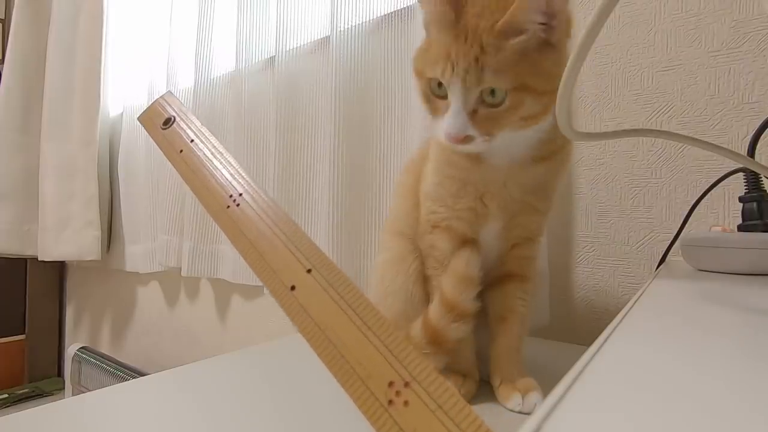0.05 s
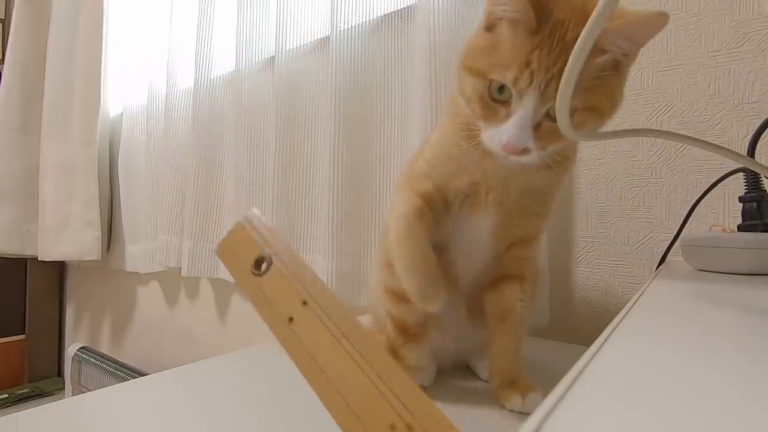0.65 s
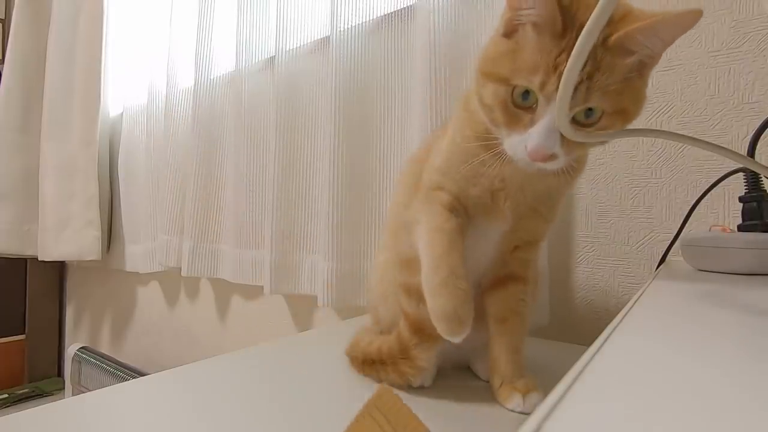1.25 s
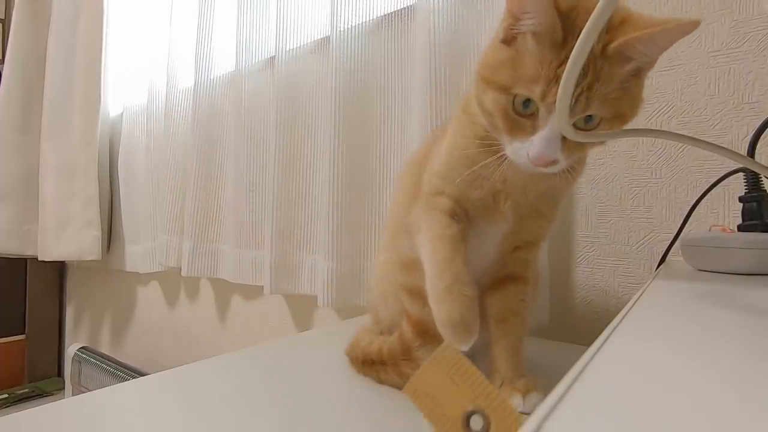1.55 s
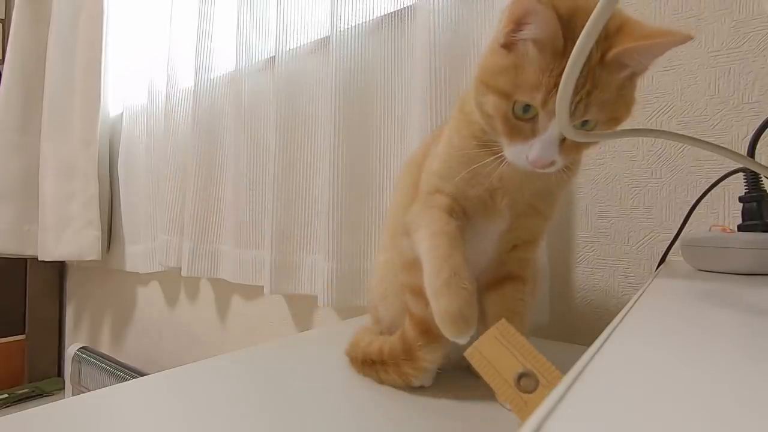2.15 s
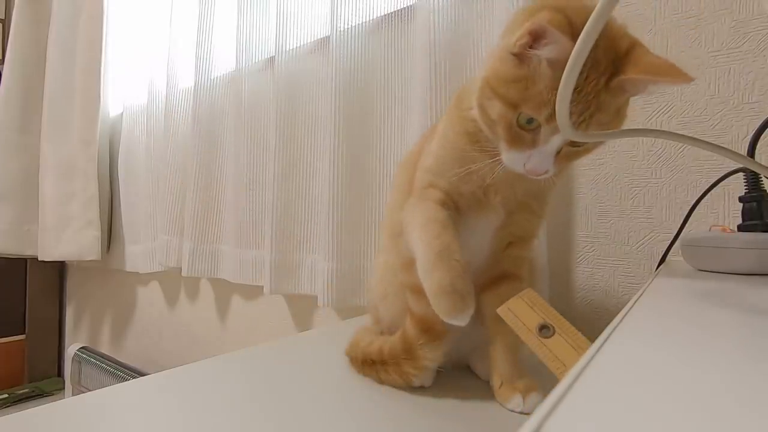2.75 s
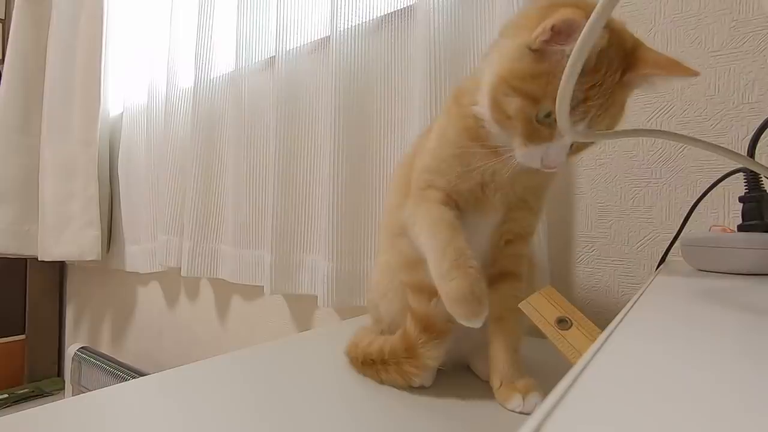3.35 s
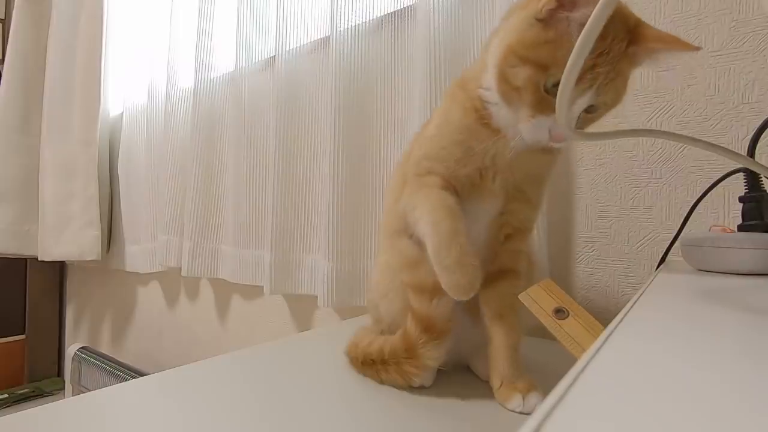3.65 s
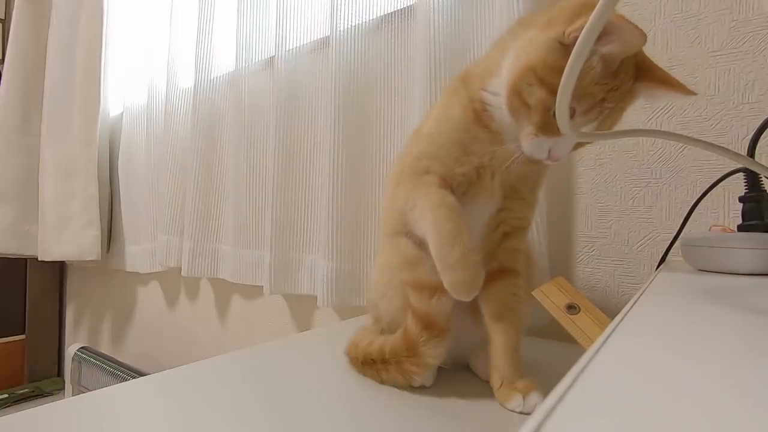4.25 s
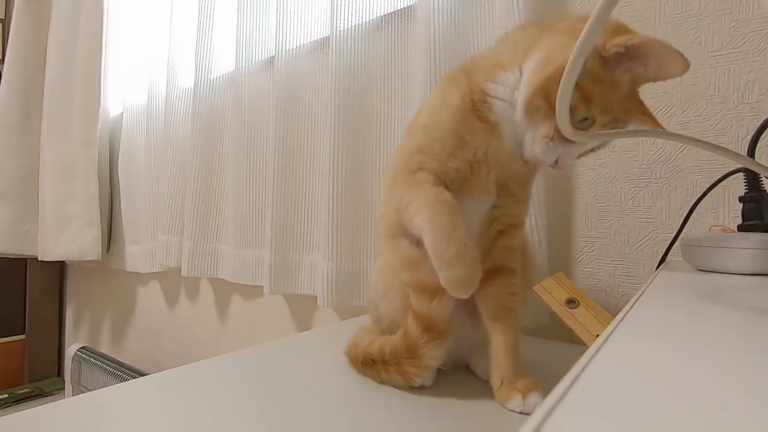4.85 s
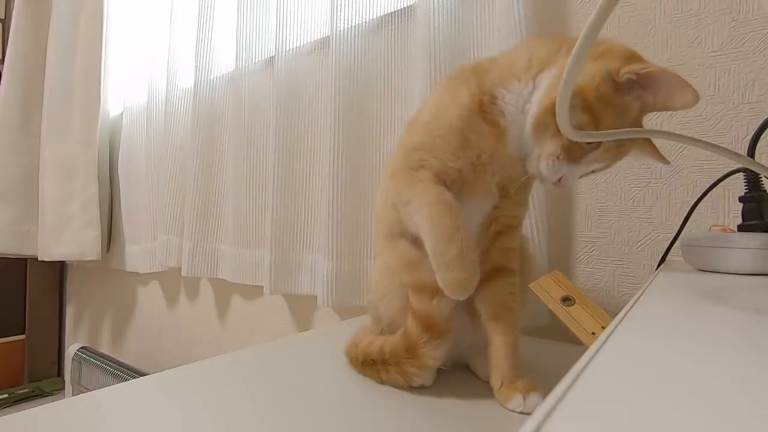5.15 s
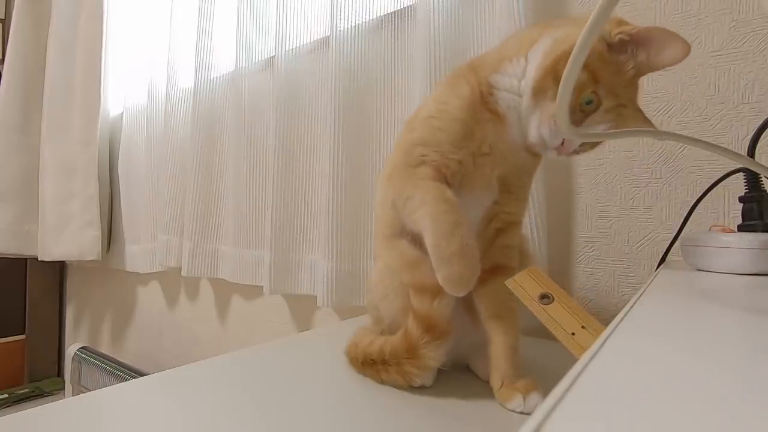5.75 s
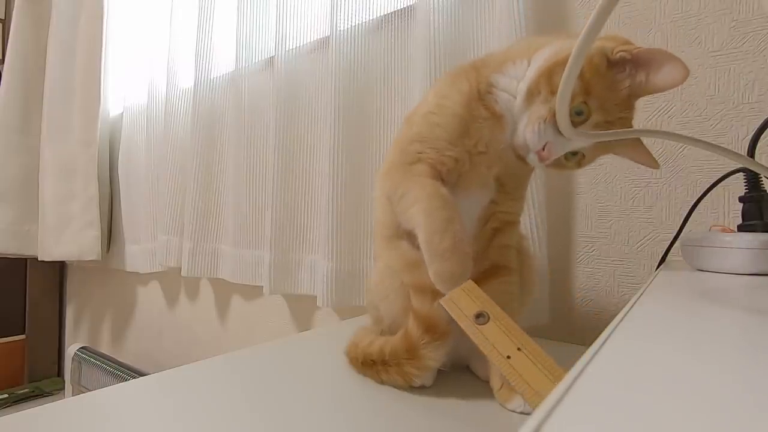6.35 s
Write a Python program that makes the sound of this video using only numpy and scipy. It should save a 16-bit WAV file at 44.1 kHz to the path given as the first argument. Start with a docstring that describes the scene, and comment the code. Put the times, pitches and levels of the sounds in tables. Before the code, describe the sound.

A wooden ruler scrapes, chatters and knocks lightly along a desk edge, over the soft hum of a small fan.

```python
"""A wooden ruler is slid and rocked along a desk's edge to tease a cat, in a quiet room with a small fan.
In the first second sliding friction makes the edge hiss, with dry skips and a few knocks. From 1.4 to
2.9 s stick-slip motion takes over: the edge chatters and catches hard, exciting the modes of ruler and
desktop, and the desk's hollow side panel rings in sympathy. The strokes then thin out, pause near 5 s
and end in a last flurry around 6 s. The fan hums on in the background."""
import sys
import numpy as np
from scipy import signal
from scipy.fft import rfft, irfft, next_fast_len
from scipy.io import wavfile
from scipy.ndimage import uniform_filter1d, map_coordinates

SR = 44100
rng = np.random.default_rng(int(sys.argv[2]) if len(sys.argv) > 2 else 0)


def inscribe(sig):
    """Save sig as 16-bit PCM at rate SR to the path in sys.argv[1].

    A 1-D sig is mono; a 2-D sig holds one channel per row.
    Samples are clipped to [-1, 1] before scaling.
    """
    pcm = np.round(np.clip(np.atleast_2d(sig).T, -1, 1) * 32767)
    wavfile.write(sys.argv[1], SR, pcm.astype(np.int16))


N = 290663
TIME = np.arange(N) / SR

# hard catches of the edge: (time [s], level [dB], desktop re level [dB], scuff re level [dB])
KNOCKS = [(0.281, -39, -1, -16), (0.315, -37, -6.5, -17), (0.446, -36.5, -10, -16), (0.5, -35, -8.5, -10),
          (0.554, -34.5, -21, -13), (0.985, -24.5, 1, -14.5), (1.376, -36, 1.5, -27.5),
          (1.402, -36.5, 10.5, -16.5), (1.431, -22.5, -11.5, -18), (1.454, -24.5, -15.5, -23),
          (1.465, -23, -3.5, -18), (1.4981, -24, -7, -14), (1.5135, -28.5, -16, -19),
          (1.5267, -26, 0.5, -29.5), (1.553, -39, -8.5, -23), (1.679, -23.5, -3.5, -15),
          (1.711, -24.5, -3.5, -14), (1.7323, -29, 2, -25), (1.75, -29.5, -3, -21.5),
          (1.946, -34.5, 1.5, -29), (2.037, -33.5, 7.5, -22.5), (2.094, -33.5, 3.5, -20.5),
          (2.1086, -29, -1.5, -28), (2.119, -26.5, 0.5, -24), (2.1337, -28, 6, -16.5),
          (2.151, -22, 0, -14.5), (2.163, -31, -7.5, -18), (2.176, -24, -2.5, -30),
          (2.1978, -28.5, -6.5, -22.5), (2.206, -25, 2.5, -16.5), (2.222, -35, -2.5, -22),
          (2.2319, -21, -8.5, -26), (2.248, -30, -7, -20), (2.266, -28, -11.5, -26.5),
          (2.274, -28.5, -10.5, -34), (2.296, -24.5, -11.5, -24), (2.311, -28, -19.5, -19),
          (2.343, -29, -6, -18), (2.355, -36, -12, -18.5), (2.382, -31, -6.5, -14.5), (2.417, -26, 0, -20),
          (2.4434, -25, 1.5, -23), (2.458, -30, 3.5, -20), (2.52, -37, -10, -25), (2.605, -32, -6, -31),
          (2.629, -35, -3, -34.5), (2.669, -33.5, -3.5, -30.5), (2.683, -32, -5, -21.5),
          (2.739, -29, -13.5, -37), (2.75, -34, -8, -20.5), (2.769, -32, 1, -24.5),
          (2.792, -25.5, -3.5, -21.5), (2.8187, -23, -12.5, -22), (2.833, -26.5, -11, -17.5),
          (2.859, -21, -18, -24.5), (2.8686, -33.5, -9.5, -18), (3.0877, -40, -5, -35),
          (3.1059, -37.5, -2.5, -29), (3.138, -33, -6, -30), (3.1445, -36.5, -2.5, -41.5),
          (3.174, -33.5, 2, -19.5), (3.1888, -29, -17, -23.5), (3.2068, -29.5, -13, -21),
          (3.2398, -33.5, -10, -25), (3.337, -40, 5, -31), (3.379, -36.5, -3, -24),
          (3.4192, -29, -5.5, -25), (3.543, -40.5, -3, -22), (3.841, -35, -12.5, -31.5),
          (3.877, -38.5, -2, -27), (3.897, -34, -7.5, -33), (3.999, -39.5, -5.5, -25), (4.118, -35, 6, -33),
          (4.18, -34, 1.5, -20), (4.252, -36, -7.5, -26), (4.457, -37.5, -4, -28), (4.737, -42.5, -3, -20),
          (4.765, -40, -5, -22), (4.781, -40.5, -2, -18), (5.297, -34, -8.5, -28), (5.399, -32.5, -8, -17),
          (5.533, -44.5, -11, -27), (5.655, -41.5, -13, -31), (5.72, -30.5, -5, -19),
          (5.735, -28.5, -11.5, -19), (5.7485, -36, -15, -9), (5.761, -31.5, -23, -7.5),
          (5.773, -36, -16, -13), (5.783, -36, -9, -10), (5.801, -39, -14, -10), (5.812, -36.5, -11, -17),
          (5.835, -35, -12, -15), (6.043, -35, -16, -19.5), (6.0605, -36.5, -14, -20),
          (6.097, -30, -19, -22.5), (6.1148, -52, -7, -29)]


def knocks():
    """Impact excitation: each hard catch rings the ruler and the desktop and scuffs the edge."""
    # the pitch sinks as more of the ruler overhangs: (time [s], frequency factor [ratio])
    pitch_drift = [(1.7, 1.0425), (3.4, 1.003)]
    out = np.zeros(N)
    for start, db, desk_db, scuff_db in KNOCKS:
        pitch = np.interp(start, *np.transpose(pitch_drift))
        add(out, start, amp(db) * (ruler_ring(pitch) + amp(desk_db) * desk_ring()))
        add(out, start, amp(db + scuff_db) * scuff())
    return out


def ruler_ring(pitch=1):
    """Bending modes of a bar: their frequencies shift with the free length at each contact; peak 1."""
    # the ruler, damped by the hand: (frequency [Hz], level [dB], T60 [s])
    modes = [(899, 7, 0.026), (1016, 8.5, 0.011), (1169, -5, 0.015), (1330.5, -6.5, 0.03),
             (1530, -22.5, 0.052), (1810, -24.5, 0.054), (2100, -28, 0.0081), (3270, -38.5, 0.013)]
    wave = ring(np.array(modes) * [pitch, 1, 1], scatter_db=2.5, detune=0.027, attack_s=0.00058)
    return wave / np.abs(signal.hilbert(wave)).max()


def desk_ring():
    """Plate modes: the desktop keeps nearly the same frequencies wherever it is struck."""
    # the desktop: (frequency [Hz], level [dB], T60 [s])
    modes = [(163, -21.5, 0.23), (185.1, -20.5, 0.12), (245.6, -16, 0.05), (279.2, -23, 0.096),
             (310.9, -15, 0.054), (348.4, -20.5, 0.1), (391.6, -23.5, 0.052), (440, -23.5, 0.05),
             (507.5, -30, 0.11), (602, -34, 0.4), (944.7, -22, 0.11), (1130, -33, 0.16)]
    return ring(modes, scatter_db=2, detune=.002, attack_s=.0008)


def ring(modes, scatter_db, detune, attack_s):
    """Modal superposition: each contact point favours other modes; yielding wood softens the onset."""
    t = np.arange(SR // 4) / SR
    hz, db, t60 = np.transpose(modes)[:, :, None]
    size, shift = rng.standard_normal((2, len(modes), 1))
    decays = amp(db + scatter_db * size - 60 * t / t60)
    waves = decays * np.sin(2 * np.pi * hz * (1 + detune * shift) * t)
    return waves.sum(0) * (1 - np.exp(-t / attack_s)) ** 2


def scuff(t60_s=.026, attack_s=.0004):
    """Release transient: torn grain gives a brief burst of noise as the edge lets go."""
    # torn grain: (frequency [Hz], relative spectral density [dB])
    spectrum = [(700, -6.5), (1250, 7.5), (1550, 6), (1950, 7), (2400, -3), (2750, -9), (3300, -13.5),
                (4100, -21), (5500, -26.5), (8000, -38), (12000, -55)]
    t = np.arange(SR // 10) / SR
    colour = amp(along(spectrum, np.fft.rfftfreq(len(t), 1 / SR)))
    grain = irfft(rfft(rng.standard_normal(len(t))) * colour)
    return unit(grain) * amp(-60 * t / t60_s) * (1 - np.exp(-t / attack_s))


def chatter(spots=6, roughness_db=-4):
    """Frictional excitation: small slips over fine roughness drive ruler and desktop at several spots."""
    chatter_db, rumble_db, scuff_db = strokes()
    force = slips() + amp(roughness_db) * rng.standard_normal(N)
    ruler_drive = amp(chatter_db - 3.5) * force * sticking()
    desk_drive = amp(rumble_db - 2) * force  # the desktop stays loaded even while the edge sticks
    scuff_drive = amp(scuff_db + 1) * ruler_drive
    spot = rng.integers(spots, size=N)
    out = np.zeros(N)
    for k in range(spots):
        responses = ruler_ring(), desk_ring(), scuff()
        for drive, wave in zip((ruler_drive, desk_drive, scuff_drive), responses):
            out += signal.oaconvolve(drive * (spot == k), wave / np.linalg.norm(wave))[:N]
    return out


def strokes():
    """Friction noise grows with speed: chatter, rumble and scuff in dB as the hand pushes the ruler."""
    # pushes, in relative levels: (time [s], duration [s], chatter [dB], desk rumble [dB], scuff [dB])
    pushes = [(0.197, 0.032, -45.5, -48, -16), (0.27, 0.296, -50, -54.5, -14),
              (0.663, 0.081, -50.5, -55, -11), (1.036, 0.018, -53.5, -52.5, 0.5),
              (1.14, 0.69, -60, -53, -10), (1.466, 0.063, -45.5, -44, -24), (1.723, 0.03, -52, -46.5, -11),
              (1.936, 0.019, -51, -46, -18.5), (2.145, 0.105, -35.5, -44, -14),
              (2.304, 0.26, -50.5, -53.5, -22.5), (2.53, 0.23, -46.5, -50, -21),
              (2.83, 0.058, -45.5, -46.5, -18.5), (3.147, 0.097, -49.5, -54.5, -14.5),
              (3.374, 0.036, -52.5, -52.5, -15.5), (3.601, 0.15, -55, -55.5, -23),
              (3.741, 0.19, -47.5, -50.5, -23.5), (3.996, 0.039, -54, -48, -15),
              (4.113, 0.13, -46.5, -53, -18.5), (4.436, 0.022, -47.5, -50.5, -20.5),
              (4.739, 0.071, -54, -55.5, -18), (5.304, 0.09, -45.5, -57, -17),
              (5.693, 0.105, -43, -56.5, -15), (6.037, 0.0097, -51.5, -63, -17.5)]
    starts, lengths, chatter_db, rumble_db, scuff_db = np.transpose(pushes)
    slopes = dict(rise_db_per_s=257.5, fall_db_per_s=298)
    # between strokes the ruler still stirs in the hand
    return (swells(starts, lengths, chatter_db, rest_db=-86, **slopes),
            swells(starts, lengths, rumble_db, rest_db=-75.5, **slopes),
            np.interp(TIME, starts + lengths / 2, scuff_db))


def slips(count=1500, jitter=.3, spread_db=2.6):
    """Stick-slip oscillation: uneven pulses, closer together when the ruler moves faster; rms 1."""
    # how often the edge slips: (time [s], rate [1/s])
    slip_rate = [(1.501, 118), (2.25, 130), (2.65, 70), (4.4, 60), (5.3, 85), (5.8, 88.4)]
    gap, size = rng.standard_normal((2, count))
    rate = np.interp(TIME, *np.transpose(slip_rate))
    onsets = np.searchsorted(np.cumsum(rate) / SR, np.cumsum(np.exp(jitter * gap)))
    heights = amp(spread_db * np.clip(size, -2, 1.5))
    pulses = np.bincount(onsets[onsets < N], heights[onsets < N], N)
    return unit(pulses / np.sqrt(rate))


def sticking(held_gain=.45):
    """Static friction: the edge holds for a moment before each hard catch, weakening the small slips."""
    gain = np.ones(N)
    for start, *_ in KNOCKS:
        gain[round((start - .008) * SR):round((start + .002) * SR)] = held_gain
    return uniform_filter1d(gain, size=64)


def overhang(contact, bending_q=15, cross_hz=2910, cross_q=29):
    """Cantilever resonance: bending modes move with the overhang; the mode across the width stays put."""
    # resonances of the free end: (time [s], cross-mode boost [dB], then frequency [Hz] and boost [dB]
    # for each of the low, middle and high bending modes)
    positions = np.array([(1.0, 4, 1630, 7.5, 2140, 6, 4700, 6), (1.499, 11.5, 1660, -1, 2220, 5, 3450, 2),
                          (1.72, -3, 1670, -1, 2270, 4.5, 3620, 4),
                          (2.3, 3.5, 1650, 0.5, 2380, 7.5, 3660, 7.5),
                          (2.8, 8, 1347, 6.5, 2477, 10.5, 4430, 4.5),
                          (3.4, 12, 1366, 2, 2480, 7, 4300, -2.5),
                          (4.299, 6.5, 1374, 0, 2380, 2.5, 4020, -4.5),
                          (5.75, 1, 1386, 6, 2420, 1, 4120, 8), (6.1, 5, 1530, 6.5, 2350, -5, 4010, 12)])
    out = contact.copy()
    for (_, cross_db, *bending), selector in zip(positions, np.eye(len(positions))):
        faded = contact * np.interp(TIME, positions[:, 0], selector)
        out += resonance(faded, cross_hz, cross_db, cross_q)
        for hz, db in zip(bending[::2], bending[1::2]):
            out += resonance(faded, hz, db, bending_q)
    return out


def slide():
    """Roughness noise: wood grain hisses unevenly under the sliding edge."""
    # free slides: (time [s], duration [s], level [dB])
    glides = [(0.188, 0.14, -56.5), (0.366, 0.06, -55.5), (0.466, 0.045, -49), (0.665, 0.032, -52),
              (1.036, 0.024, -65.5), (1.088, 0.065, -65.5), (5.745, 0.053, -64), (6.042, 0.016, -71)]
    hiss_db = swells(*np.transpose(glides), rise_db_per_s=317, fall_db_per_s=247, rest_db=-82.5)
    grain = unit(amp(2.6 * wobble(130) + 3.8 * wobble(600)))
    return filtered(amp(hiss_db) * grain * rng.standard_normal(N), edge_colour)


def ticks(boost_db=17.5, t60_s=0.012, attack_s=0.00056, highpass_hz=3500):
    """Intermittent contact: each skip of the edge is a dry, brighter burst of the sliding rasp."""
    # skips of the sharp edge: (time [s], relative level [dB])
    skips = [(0.563, -56), (0.569, -52), (0.578, -58), (0.6075, -52), (0.6305, -57), (0.648, -57),
             (0.672, -48.5), (0.685, -57), (0.704, -57), (0.721, -51), (0.738, -56), (0.745, -52.5),
             (0.7704, -56.5), (0.9832, -56.5), (1.025, -53), (1.0353, -55.5), (6.097, -61.5)]
    t = np.arange(SR // 30) / SR
    bursts = np.zeros(N)
    for start, db in skips:
        envelope = amp(db + boost_db - 60 * t / t60_s) * (1 - np.exp(-t / attack_s))
        add(bursts, start, envelope * rng.standard_normal(len(t)))
    return filtered(bursts, lambda hz: edge_colour(hz) * 1j * hz / (1j * hz + highpass_hz))


def edge_colour(hz):
    """Source and filter: the gain of the sliding edge is a falling rasp with a few resonance peaks."""
    # friction noise: (frequency [Hz], relative spectral density [dB])
    rasp = [(500, -26), (950, 2), (1400, 3), (2000, -2.5), (2700, -13.5), (4200, -20), (5100, -25.5),
            (6200, -22.5), (8000, -26.5), (10000, -33.5), (12500, -44.5)]
    # resonances in the slide: (frequency [Hz], bandwidth [Hz], boost [dB])
    peaks = [(1630, 120, 4), (2220, 180, 7), (2943, 90, 12), (3440, 120, 6.5), (4820, 220, 6),
             (5500, 480, 9.5)]
    peaks_db = sum(db / (1 + (2 * (hz - centre) / width) ** 2) for centre, width, db in peaks)
    return unit(amp(along(rasp, hz) + peaks_db))


def desk_body(wood):
    """Resonance and antiresonance: the desk favours some frequencies and swallows others."""
    # peaks and hollows of the desk: (frequency [Hz], bandwidth [Hz], gain [dB])
    bands = [(540, 90, -5), (690, 200, -4.5), (850, 70, -3.5), (926, 14, 5), (978, 16, 3.5), (1062, 20, 4),
             (1210, 45, 4.5), (1372, 40, 2), (1655, 50, 2.5), (1950, 160, -5), (4700, 900, 1.5)]
    for hz, width, db in bands:
        wood = wood + resonance(wood, hz, db, hz / width)
    return wood


def panel(wood, t60_s=.36):
    """Sympathetic vibration: the hollow side panel rings on after each scrape of the ruler."""
    # the panel's mode, sagging in pitch as the load eases: (time [s], frequency [Hz], boost [dB])
    mode = [(1.5, 793, 9), (2.1, 805, 10), (2.2, 784, 14.5), (2.7, 791, 14), (2.83, 790.7, 15),
            (2.98, 775, 18), (3.15, 788.7, 13), (4.28, 785.7, 20.5), (4.7, 784, 14), (5.4, 771, 6.5)]
    times, hz, db = np.transpose(mode)
    carrier = np.exp(2j * np.pi * np.cumsum(np.interp(TIME, times, hz)) / SR)
    pole = np.exp(-np.log(1000) / (t60_s * SR))
    # a gliding resonator: shift the mode to 0 Hz, smooth, shift back
    drive = (amp(np.interp(TIME, times, db)) - 1) * wood / carrier
    return 2 * np.real(carrier * signal.lfilter([1 - pole], [1, -pole], drive))


def shoves(t60_s=0.37, attack_s=0.0088):
    """A slow force excites mainly low frequencies: the whole desk answers a shove with a dull thud."""
    # soft shoves on the desk: (time [s], level [dB])
    pushes = [(.21, -66), (.73, -60), (1.0, -56), (1.08, -62), (1.48, -59.5), (1.69, -60.5), (4.78, -66)]
    spectrum = [(20, -7), (50, 2), (110, 5), (300, -47), (1000, -120)]  # (frequency [Hz], gain [dB])
    t = np.arange(SR // 2) / SR
    envelope = np.zeros(N)
    for start, db in pushes:
        add(envelope, start, amp(db - 60 * t / t60_s) * (1 - np.exp(-t / attack_s)))
    rumble = filtered(rng.standard_normal(N), lambda hz: amp(along(spectrum, hz)))
    return envelope * unit(rumble)


def room(source, places=12, hop=128):
    """Diffuse reverberation: the wall reflections differ at each ear and change as the ruler moves."""
    # reverberation time: (frequency [Hz], T60 [s])
    decay = [(150, 0.18), (800, 0.21), (2000, 0.15), (9000, 0.14)]
    out = np.zeros((2, N))
    place = np.linspace(0, places - 1, N)
    for k in range(places):
        hz, _, noise = signal.stft(rng.standard_normal((2, SR // 3)), SR, nperseg=2 * hop)
        t = np.arange(noise.shape[-1]) * hop / SR
        tail = signal.istft(noise * amp(-60 * t / along(decay, hz)[:, None]), SR, nperseg=2 * hop)[1]
        tail = np.pad(tail / np.linalg.norm(tail[0]), ((0, 0), (SR // 250, 0)))  # 4 ms late
        crossfade = np.maximum(1 - np.abs(place - k), 0)
        out += signal.oaconvolve((source * crossfade)[None], tail, axes=1)[:, :N]
    return out


def fan():
    """Broadband and tonal fan noise: a steady rush of air with slightly wavering motor and blade tones."""
    # air in the room: (frequency [Hz], relative spectral density [dB])
    spectrum = [(20, -29), (40, -9.5), (90, -18.5), (170, 5), (250, -4.5), (500, -11), (850, -6.5),
                (1120, -2), (1350, -15), (2000, -23), (3300, -38.5), (5000, -41.5), (7000, -46.5),
                (12000, -54)]
    # likeness of the rush at the two ears: (frequency [Hz], correlation [ratio])
    coherence = [(60, 0.58), (100, 0.91), (180, 0.88), (320, 0.54), (550, 0.73), (960, 0), (2900, 0.099)]
    # motor and blade tones: (frequency [Hz], level [dB])
    tones = [(119.5, -70), (145, -71.5), (198.7, -64.5), (596.5, -72.5), (795, -75.5), (1093, -78),
             (1390, -80.5), (2385, -90)]
    # the fan's stereo balance: (frequency [Hz], left minus right [dB])
    balance = [(60, -2.5), (300, -1), (520, -3.5), (800, -3.5), (1200, -7.5), (1900, -0.5), (8000, -1.5)]

    def mid_side_gains(hz):
        angle = np.arccos(np.clip(along(coherence, hz), -1, 1)) / 2
        return amp(along(spectrum, hz)) * [np.cos(angle), np.sin(angle)]

    mid, side = filtered(rng.standard_normal((2, N)), mid_side_gains)
    rush = amp(-55.5) * unit(np.array([mid + side, mid - side]))
    hum = np.zeros(N)
    for hz, db in tones:
        amplitude = np.sqrt(2) * amp(db + 2.95 * wobble(5.6))
        hum += amplitude * np.sin(2 * np.pi * hz * TIME + 0.13 * wobble(3.5))
    return filtered(rush + hum, lambda hz: sides(balance, hz))


def swells(starts, lengths, levels_db, rise_db_per_s, fall_db_per_s, rest_db):
    """Exponential growth and decay: the level in dB of movements that swell, hold and die away."""
    level = np.full(N, float(rest_db))
    for start, length, db in zip(starts, lengths, levels_db):
        before = np.maximum(start - TIME, 0)
        after = np.maximum(TIME - start - length, 0)
        level = np.maximum(level, db - rise_db_per_s * before - fall_db_per_s * after)
    return level


def resonance(x, hz, db, q):
    """What a second-order resonator adds to x to change its level by db at hz."""
    return (amp(db) - 1) * signal.lfilter(*signal.iirpeak(hz, q, SR), x)


def amp(db):
    """Decibels to amplitude ratio."""
    return 10 ** (np.asarray(db) / 20)


def unit(x):
    """Normalisation to rms 1."""
    return x / np.sqrt(np.mean(x ** 2) + 1e-20)


def along(points, hz):
    """Interpolation of (frequency [Hz], value) points on a logarithmic axis."""
    frequencies, values = np.transpose(points)
    return np.interp(np.log(hz + 1), np.log(frequencies), values)


def wobble(rate):
    """Smooth random modulation with rate knots a second."""
    return map_coordinates(rng.standard_normal(int(N * rate / SR) + 4), [TIME * rate])


def filtered(x, response):
    """Linear filtering: the spectrum of x times a complex frequency response."""
    size = next_fast_len(N + SR // 2)
    return irfft(rfft(x, size) * response(np.fft.rfftfreq(size, 1 / SR)), size)[..., :N]


def sides(balance, hz):
    """Left and right gains from a table of level differences."""
    return amp(np.outer([.5, -.5], along(balance, hz)))


def add(track, start_s, sound):
    """Superposition of a sound on a track."""
    part = track[max(round(start_s * SR), 0):][:len(sound)]
    part += sound[:len(part)]


def scene(desk_cut_hz=142):
    """Direct plus reverberant field: ruler and desk sound mostly from the right, over the fan."""
    # phase difference of the direct sound: (frequency [Hz], lead of the left channel [rad])
    lead = [(100, 4), (160, 0.66), (220, -0.65), (360, -0.5), (430, 1.5), (650, 5), (760, 2), (1300, 1.3),
            (1650, 2), (2400, 1.37), (5000, 1.5)]
    # stereo balance of ruler and desk: (frequency [Hz], left minus right [dB])
    balance = [(140, -4.5), (270, -2), (370, 11), (500, -12), (800, -6.5), (1250, -6), (2000, -6.5),
               (4000, -1.5), (10000, -3.5)]
    # the walls scatter more treble than low ring: (frequency [Hz], gain [dB])
    scatter = [(200, -3), (1000, -9.5), (2200, -3.5), (6000, 0)]
    # little of the ruler and desk comes through below about 140 Hz
    low_cut = signal.butter(3, desk_cut_hz, 'high', fs=SR, output='sos')
    wood = desk_body(overhang(knocks() + chatter()) + slide())
    wood = signal.sosfilt(low_cut, wood + panel(wood))
    skips = ticks()
    direct = filtered(wood + skips, lambda hz: np.exp(1j * np.outer([.5, -.5], along(lead, hz))))
    walls = room(filtered(wood + .5 * skips, lambda hz: amp(along(scatter, hz))))
    return filtered(direct + walls + shoves(), lambda hz: sides(balance, hz)) + fan()


def record(dry, top_hz=13000):
    """Band limiting: a steep low-pass removes the highest treble."""
    return filtered(dry, lambda hz: 1 / np.sqrt(1 + (hz / top_hz) ** 40))


dry = scene()
out = record(dry)
inscribe(out)
```